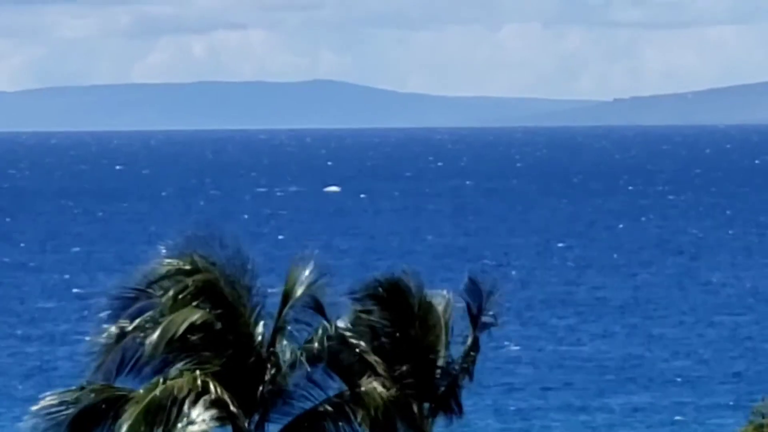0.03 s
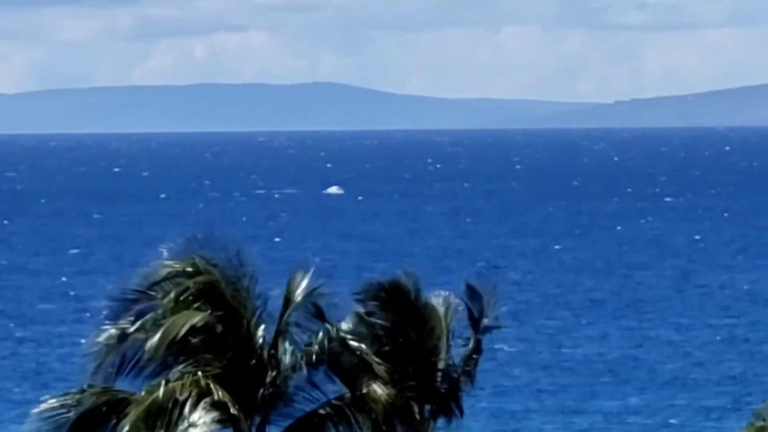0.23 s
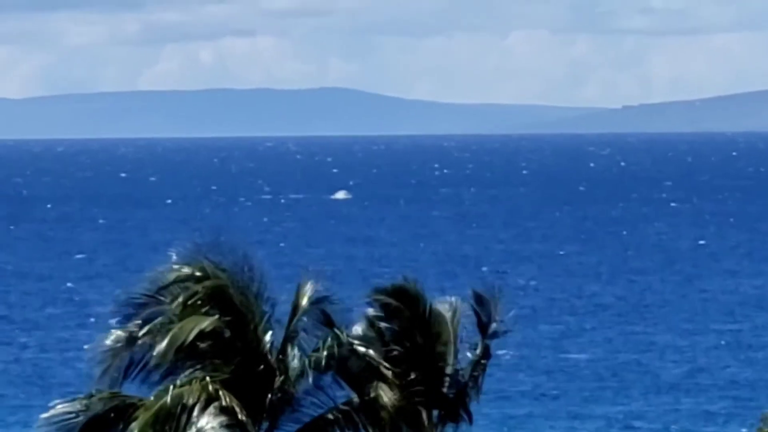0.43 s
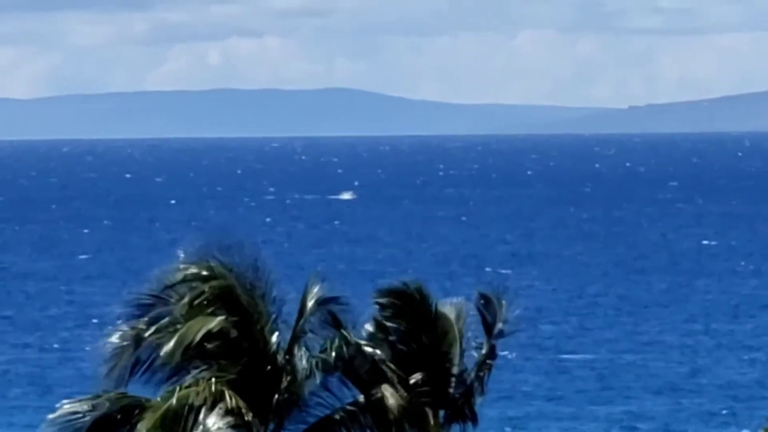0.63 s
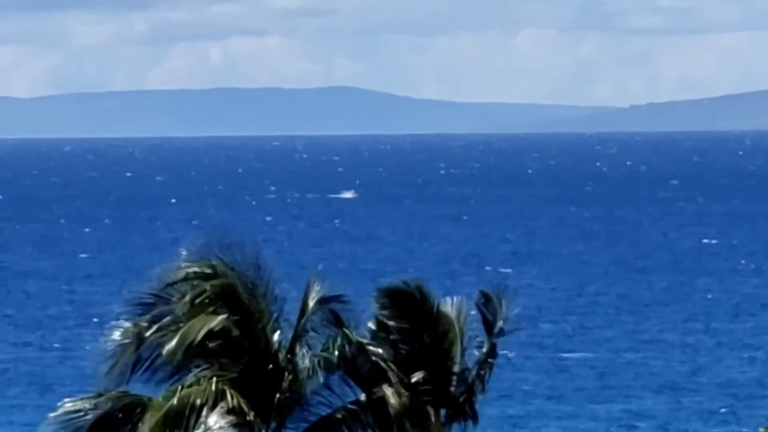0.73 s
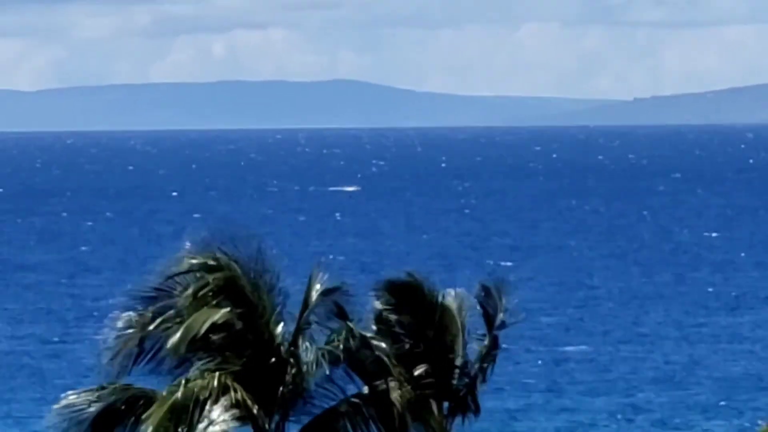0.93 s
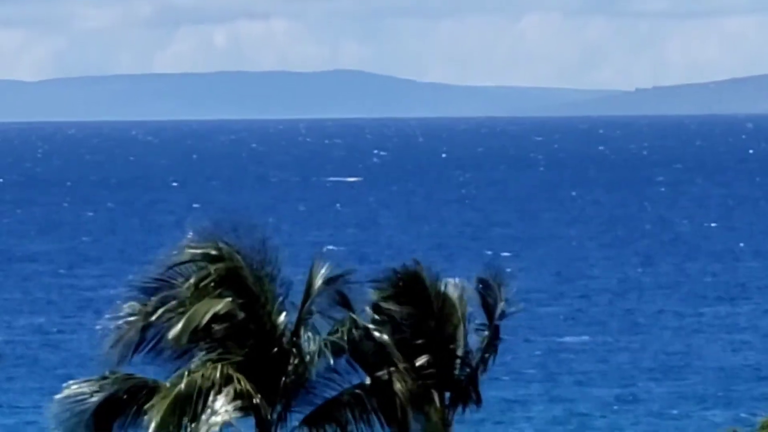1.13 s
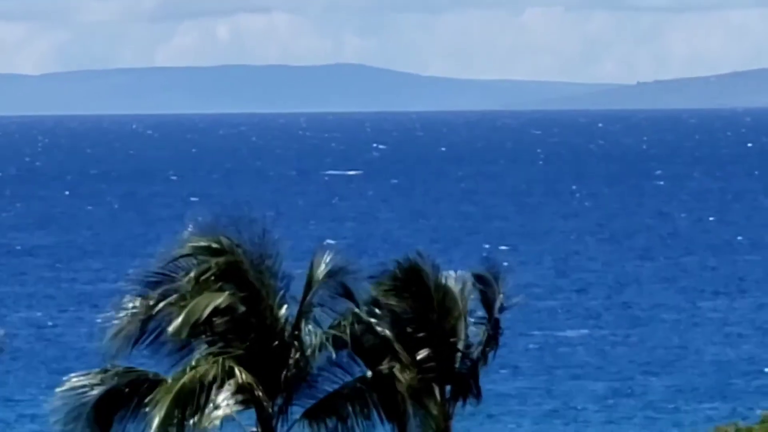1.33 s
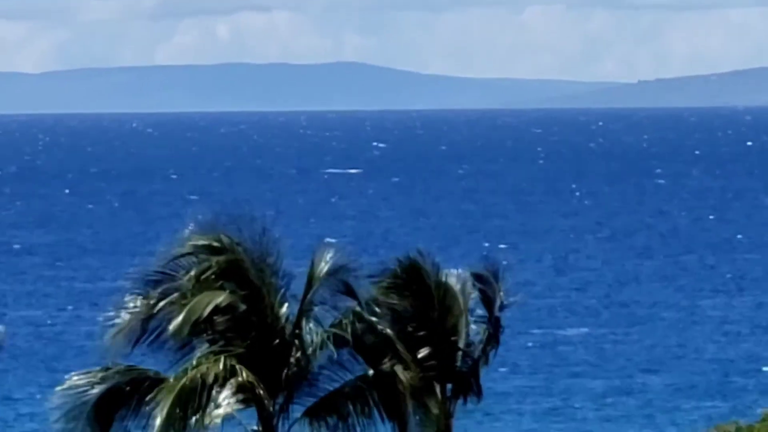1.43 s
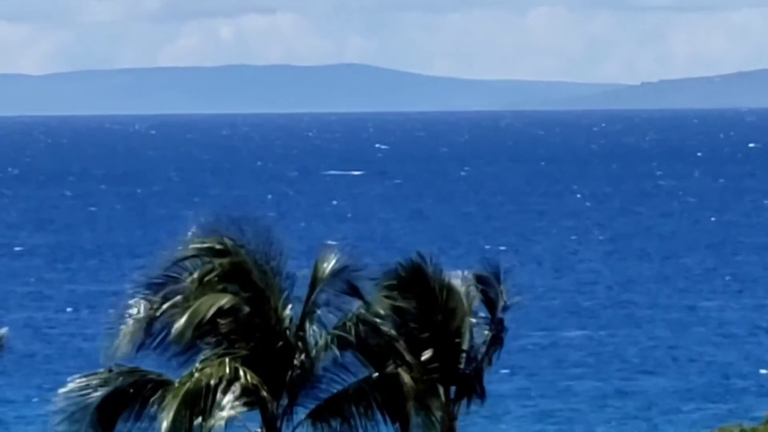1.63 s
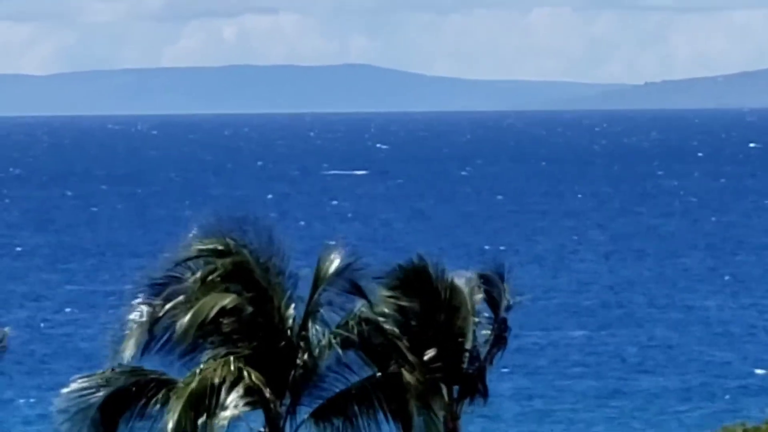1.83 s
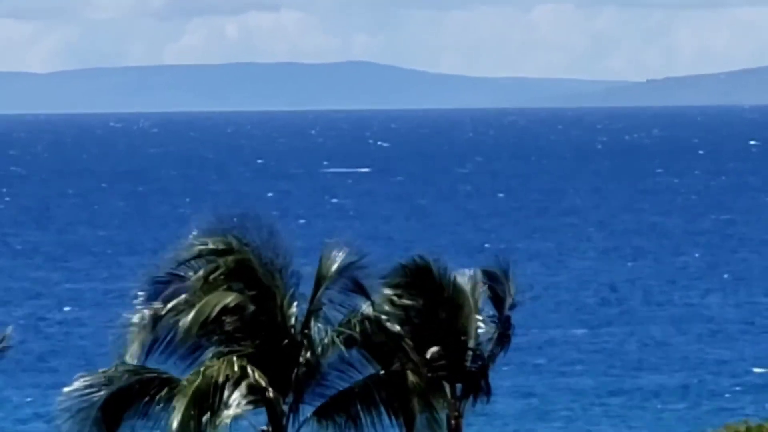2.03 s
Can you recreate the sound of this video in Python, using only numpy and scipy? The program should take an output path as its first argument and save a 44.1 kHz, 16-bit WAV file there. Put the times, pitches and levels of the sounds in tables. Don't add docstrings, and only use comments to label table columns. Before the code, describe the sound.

Wind gusts on a phone microphone by the coast. Until 0.2 s only soft surf, rustling fronds and faint bird chirps; then low thumps burst at 0.25-0.3 s, cluster left and right, peaking near 0.6 s. A short lull around 0.85 s, another gust at 0.97-1.1 s, weaker thumps, a quiet gap near 1.4 s, a left-side puff at 1.55 s, then mostly faint rustle and distant falling whistles to 2.1 s.

```python
import sys
import numpy as np
from scipy import signal
from scipy.fft import rfft, irfft
from scipy.io import wavfile
from scipy.ndimage import uniform_filter1d, map_coordinates

SR = 44100
rng = np.random.default_rng(int(sys.argv[2]) if len(sys.argv) > 2 else 0)


def master(y):
    cut = np.clip(np.atleast_2d(y).T, -1, 1)
    pcm = np.round(cut * 32767)
    wavfile.write(sys.argv[1], SR, pcm.astype(np.int16))


def rack_gain(trim_db):
    fader = np.asarray(trim_db, float)
    return 10 ** (fader / 20)


N = 92610


def unit(x):
    return x / np.sqrt(np.mean(x ** 2) + 1e-20)


def along(points, hz):
    f, v = np.transpose(points)
    return np.interp(np.log(hz + 1), np.log(f + 1), v)


def curves(rows):
    s, *columns = np.transpose(rows)
    t = np.arange(N) / SR
    return np.array([np.interp(t, s, column) for column in columns])


def wobble(rate):
    return map_coordinates(rng.standard_normal(900), [np.arange(N) * rate / SR])


def blurred(field, bins, frames):
    return uniform_filter1d(uniform_filter1d(field, bins, axis=-2), frames, axis=-1)


def rush(spectrum, alike, patchy_db):
    z = signal.stft(rng.standard_normal((2, N)), nperseg=512)[2]
    patches = unit(blurred(rng.standard_normal(z.shape[1:]), 6, 12))
    pair = signal.istft(z * rack_gain(patchy_db * patches), nperseg=512)[1][:, :N]
    hz = np.fft.rfftfreq(N, 1 / SR)
    inside = (hz > spectrum[0][0] / 2) & (hz < spectrum[-1][0] * 1.02)
    turn = np.arccos(np.clip(along(alike, hz), -1, 1)) / 2
    shape = rack_gain(along(spectrum, hz)) * inside
    mid, side = irfft(rfft(pair) * shape * [np.cos(turn), np.sin(turn)], N)
    return unit(np.array([mid + side, mid - side]))


# start_s, surf_db, rustle_db
SWELLS = [(0, -48.5, -62.5), (.1, -48, -60), (.2, -51.5, -61), (.35, -51, -61.5), (.5, -55.5, -58),
          (.63, -54.5, -62), (.78, -52.5, -56.5), (.9, -56.5, -62), (1.0, -50.5, -60.5), (1.1, -54.5, -61),
          (1.2, -53, -59), (1.3, -52, -59.5), (1.45, -55.5, -61.5), (1.62, -52.5, -58.5), (1.74, -55, -64),
          (1.83, -53.5, -58.5), (1.95, -56.5, -63.5), (2.1, -54, -56)]
# freq_hz, density_db (per Hz)
SURF_COLOUR = [(120, -14), (300, 0), (520, -7.5), (780, -1.5), (1000, -7.5), (1400, -8.5)]
LEAF_COLOUR = [(700, -20.5), (1150, -3.5), (1550, 1), (1900, -5), (3100, -16), (4000, -27.5), (6000, -32)]
AIR_COLOUR = [(2500, -7.5), (4000, -6), (6000, 5), (7700, 2)]
# freq_hz, correlation (-1 to 1)
PORT_LIKENESS = [(200, .1), (600, .55), (900, 0), (1150, -.65), (1700, -.5), (2300, .1), (4000, .05)]


def fronds():
    surf_db, rustle_db = curves(SWELLS)
    surf = rack_gain(surf_db + .6 * wobble(12)) * rush(SURF_COLOUR, PORT_LIKENESS, patchy_db=1.2)
    rustle = rack_gain(rustle_db + .6 * wobble(12)) * rush(LEAF_COLOUR, PORT_LIKENESS, patchy_db=1.2)
    air = rack_gain(-65.5) * rush(AIR_COLOUR, PORT_LIKENESS, patchy_db=1.9)
    return surf + rustle + air


# start_s, length_s, first_pitch_hz, level_db
HELD_NOTES = [(0, 0.072, 4400, -66), (.05, 0.024, 3716, -54), (.06, 0.028, 3970, -53),
              (.105, 0.024, 4000, -57), (.375, .03, 6900, -60), (.4, 0.026, 7550, -63),
              (.388, .026, 5500, -52), (.703, 0.065, 5130, -62), (.71, 0.019, 4400, -60.5),
              (.79, 0.07, 4370, -63.5), (.91, 0.032, 4130, -62.5), (.958, 0.021, 4060, -57),
              (.988, 0.029, 4180, -58.5), (1.02, 0.065, 4080, -65), (1.07, 0.031, 3070, -60.5),
              (1.16, 0.021, 5000, -61), (1.238, 0.059, 4275, -62), (1.32, 0.053, 3850, -73),
              (1.4, 0.039, 3840, -66), (1.45, 0.14, 5840, -67), (1.57, 0.068, 4834, -61.5),
              (1.755, 0.09, 5640, -67), (1.93, 0.065, 4580, -67), (1.65, .07, 4950, -75)]
FAR_CHATTER = [(0, 0.11, 4240, -63), (.075, 0.079, 3745, -60), (.16, 0.058, 4910, -64),
               (.2, 0.064, 4030, -62), (.335, 0.09, 7200, -59), (.51, 0.066, 4730, -62),
               (.68, 0.099, 5510, -60), (.95, 0.12, 3700, -65), (1.12, 0.042, 5220, -66.5),
               (1.14, 0.071, 4370, -63), (1.26, 0.13, 3995, -62), (1.4, 0.052, 4170, -72),
               (1.5, 0.07, 3950, -72), (1.58, 0.074, 4600, -68), (1.92, 0.089, 4090, -70),
               (2.045, 0.047, 3855, -64.5)]
FALLING_NOTES = [(.372, 0.087, 5195, -56), (.455, 0.055, 4840, -52.5), (.6, 0.054, 5070, -60.5),
                 (.69, .03, 5850, -60.5), (.76, .06, 5200, -65.5), (1.105, 0.05, 4550, -69),
                 (1.275, 0.042, 4180, -55), (1.17, 0.086, 4150, -71), (1.483, .027, 5230, -64),
                 (1.54, 0.028, 5070, -61.5), (1.797, .12, 4320, -60), (1.825, 0.066, 4510, -56.5),
                 (1.995, 0.072, 4120, -63.5)]
# freq_hz, density_db (per Hz)
FLOCK_COLOUR = [(3200, -17.5), (3700, 0.5), (4200, 3.5), (5000, -6), (5800, -17), (6500, -17.5)]


def whistle(pitch_hz, rough_hz):
    return np.sin(2 * np.pi * np.cumsum(pitch_hz + rough_hz) / SR)


def birds():
    t, song = np.arange(N) / SR, np.zeros(N)
    warble_hz = 25 * wobble(60) + 85 * wobble(300)
    halo_hz = 300 * wobble(400)
    flutter = rack_gain(2.8 * wobble(90))
    attack_s = .008
    # notes, sag in Hz per s, level of the line dB, level of the halo dB
    voices = ((FALLING_NOTES, 4200, 0, -7), (HELD_NOTES, 600, 0, -7), (FAR_CHATTER, 600, -20, 0))
    for rows, sag, line_db, halo_db in voices:
        shifts = rng.integers(N, size=len(rows))
        for (s, length, first_hz, db), shift in zip(rows, shifts):
            u = np.clip((t - s) / length, 0, 1)
            pitch_hz = first_hz - sag * length * u ** .85
            line = rack_gain(line_db) * whistle(pitch_hz, np.roll(warble_hz, shift))
            halo = rack_gain(halo_db) * whistle(pitch_hz, np.roll(halo_hz, shift))
            shape = np.clip(np.minimum(u, (1 - u) / 2) * length / attack_s, 0, 1)
            song += rack_gain(db) * shape * np.roll(flutter, shift) * (line + halo)
    echo_t60_s = .11
    tail = rng.standard_normal((2, SR // 2)) * rack_gain(-60 * t[:SR // 2] / echo_t60_s)
    echo = signal.fftconvolve(song[None], tail / np.linalg.norm(tail[0]), axes=1)[:, :N]
    flock = rack_gain(-69.5) * rush(FLOCK_COLOUR, [(4000, .05)], patchy_db=2)
    direct = np.array([song, np.roll(song, shift=9)])
    return direct + rack_gain(-2) * echo + flock


def eddies(rows, spray):
    t, thumps, cloud = np.arange(N) / SR, np.zeros(N), np.zeros(N)
    turns, puff_s = 0.6, 0.016
    phases = rng.uniform(0, 2 * np.pi, (len(rows), 1))
    for (s, db, hz, spray_db), phase in zip(rows, phases):
        u = t - s
        swell = np.exp(-(u * hz / turns) ** 2)
        thumps += rack_gain(db - 2.77) * swell * np.sin(2 * np.pi * hz * u + phase)
        cloud += rack_gain(spray_db + 4) * np.exp(-(u / puff_s) ** 2)
    return thumps + cloud * spray


# start_s, left_db, right_db
GUSTS = [(0, -47.5, -51), (.15, -46, -48), (.22, -32, -34), (.3, -30, -47.5), (.45, -35, -45),
         (.55, -37, -31.5), (.63, -48, -34), (.75, -52, -42.5), (.88, -36, -38.5), (1.03, -35.5, -26),
         (1.2, -44.5, -46.5), (1.3, -51, -55), (1.36, -47, -45), (1.5, -40, -53), (1.6, -40.5, -46),
         (1.72, -63, -47.5), (1.87, -65, -48), (2.1, -76, -53)]
# freq_hz, density_db (per Hz)
RUMBLE_COLOUR = [(22, -13), (40, -3), (65, 0), (105, -3), (170, -12), (400, -30), (800, -48)]
SPRAY_COLOUR = [(90, -39.5), (150, 5), (250, -6), (400, -10.5), (700, -30.5)]
# start_s, level_db, pitch_hz, spray_db
LEFT_EDDIES = [(0.121, -36, 70, -59), (0.297, -13, 76, -30.5), (0.322, -33, 105, -39.5),
               (0.344, -31.5, 96, -53.5), (0.384, -24, 88, -40.5), (0.414, -22, 87, -43),
               (0.5, -18, 92, -62), (0.523, -16, 94, -49.5), (0.553, -22, 132, -44), (0.624, -34, 68, -54),
               (0.661, -24, 71, -44), (0.697, -19.5, 80, -33), (0.722, -36, 57, -40.5),
               (0.747, -45, 104, -62), (0.794, -30, 87, -50), (1.002, -21, 89, -36.5),
               (1.094, -25, 62, -66), (1.142, -29.5, 71, -64), (1.219, -35, 70, -73), (1.244, -24, 67, -78),
               (1.479, -48, 98, -56), (1.517, -27.5, 47, -50), (1.546, -16.5, 84, -39),
               (1.571, -26, 90, -48.5), (1.642, -34, 83, -60)]
RIGHT_EDDIES = [(0.272, -27, 140, -37), (0.3, -16.5, 108, -30), (0.414, -40, 86, -42),
                (0.442, -26.5, 84, -58), (0.5, -39, 98, -55), (0.535, -28, 87, -57), (0.555, -24, 121, -54),
                (0.617, -18, 77, -47), (0.685, -14, 92.6, -32), (0.707, -22, 112, -40),
                (0.744, -18, 96, -44.5), (0.779, -21, 86.4, -50), (0.83, -33, 65, -52),
                (0.89, -31.5, 97, -53), (0.919, -22.5, 122, -45), (1.004, -15, 78.5, -43.5),
                (1.103, -31, 85, -52.5), (1.137, -23, 80, -63), (1.162, -33, 59.4, -53),
                (1.243, -29, 73, -61), (1.571, -31, 100, -54), (1.592, -26, 75.5, -55),
                (1.632, -25, 64.4, -53), (1.84, -33, 85, -53.5), (1.863, -35.5, 80, -53.5)]
SHARED_EDDIES = [
    (0.22, -21.5, 72.0, -60),
    (0.246, -13.5, 88.4, -39.5),
    (0.585, -11, 105.7, -30.5),
    (0.97, -16.5, 87, -38),
    (1.07, -18.5, 69.4, -50),
]


def buffet():
    apart = [(30, .05)]
    lumps = rack_gain(2.5 * np.array([wobble(30), wobble(30)]))
    rumble = unit(lumps * rush(RUMBLE_COLOUR, apart, patchy_db=.5))
    bed = rack_gain(curves(GUSTS)) * rumble
    spray = unit(rack_gain(2 * wobble(60)) * rush(SPRAY_COLOUR, apart, patchy_db=.5))
    shared = eddies(SHARED_EDDIES, spray)
    return bed + shared + [eddies(LEFT_EDDIES, spray[0]), eddies(RIGHT_EDDIES, spray[1])]


def scene():
    return buffet() + fronds() + birds()


# start_s, length_s, depth_db
BASS_DROPOUTS = [
    (0.156, 0.065, -29),
    (0.824, 0.11, -30),
    (1.373, 0.081, -35),
    (1.655, 0.075, -33),
    (1.798, 0.062, -7),
    (1.915, 0.16, -16),
]


def left_filter(hz, t):
    shut_db = sum(db * ((t > s) & (t < s + length)) for s, length, db in BASS_DROPOUTS)
    bass_db = np.outer(hz < 270, shut_db)
    return rack_gain(bass_db - 60 * np.clip((hz[:, None] - 7900) / 250, 0, 1))


# start_s, limit_hz
RIGHT_LIMIT = [(0, 7300), (.12, 6850), (.2, 6300), (.3, 6100), (.33, 7500), (.4, 8000), (.5, 7300),
               (.6, 6700), (.7, 7900), (.82, 6800), (.95, 5600), (1.15, 5630), (1.22, 6250), (1.4, 6000),
               (1.45, 7900), (1.54, 7440), (1.6, 6300), (2.1, 6200)]


def right_filter(hz, t):
    ragged_hz = 120 * np.repeat(rng.standard_normal(len(t)), repeats=8)[:len(t)]
    limit_hz = np.interp(t, *np.transpose(RIGHT_LIMIT)) + ragged_hz
    limit_db = -60 * np.clip((hz[:, None] - limit_hz) / 150, 0, 1)
    dull_db = -5.5 * np.clip(hz[:, None] / 1000 - 5, 0, 3)
    return rack_gain(limit_db + dull_db)


# freq_hz, density_db (per Hz)
HISS_COLOUR = [(7800, 1), (10500, -4.5), (12000, -1), (14400, -4.5)]
# freq_hz, odds_sigma
GATE_ODDS = [(7900, -2), (9000, -2.6), (10300, -1.7), (11300, -.7), (14400, -.8)]
GATE_SWINGS = [
    .015,
    .61,
    .89,
    1.031,
    1.12,
]


def gated_hiss(hz, t):
    noise = rack_gain(-71) * rush(HISS_COLOUR, [(9000, 0.0052)], patchy_db=1.5)
    hiss = signal.stft(noise, nperseg=1024, noverlap=768)[2]
    small = unit(blurred(rng.standard_normal(hiss.shape), 4, 9))
    tall = unit(blurred(rng.standard_normal(hiss.shape), 45, 12))
    chance = .8 * small + .6 * tall
    swing_s = 0.048
    wide = 1.8 * sum(np.exp(-((t - s) / swing_s) ** 2) for s in GATE_SWINGS)
    right_bias = [[[0]], [[1.42]]]
    gate = chance + np.outer(hz > 9000, wide) + along(GATE_ODDS, hz)[:, None] + right_bias > 0
    return hiss * gate * (hz > HISS_COLOUR[0][0])[:, None]


def shape_ports(dry):
    hz, t, z = signal.stft(dry, SR, nperseg=1024, noverlap=768)
    gains = np.array([left_filter(hz, t), right_filter(hz, t)])
    kept = z * gains + gated_hiss(hz, t)
    return signal.istft(kept, nperseg=1024, noverlap=768)[1][:, :N]


def top_cut(x):
    return signal.sosfilt(signal.butter(12, 14500, fs=SR, output="sos"), x)


def record(dry):
    return top_cut(shape_ports(dry))


dry = scene()
out = record(dry)
master(out)
```